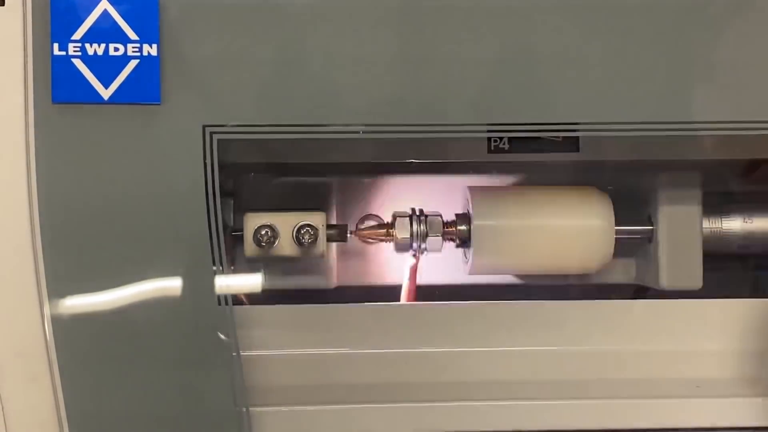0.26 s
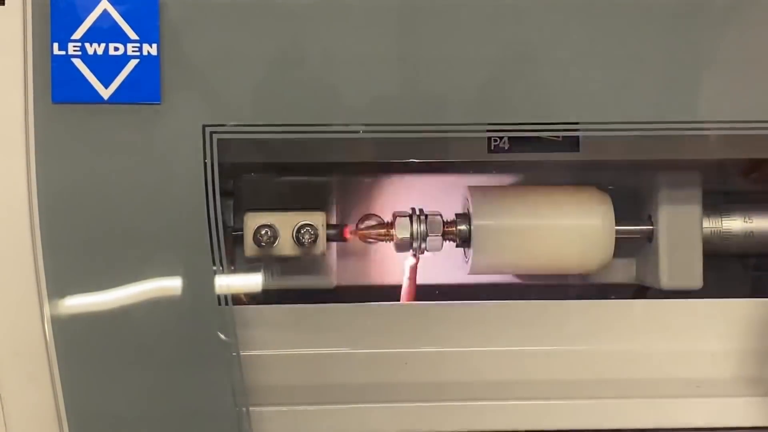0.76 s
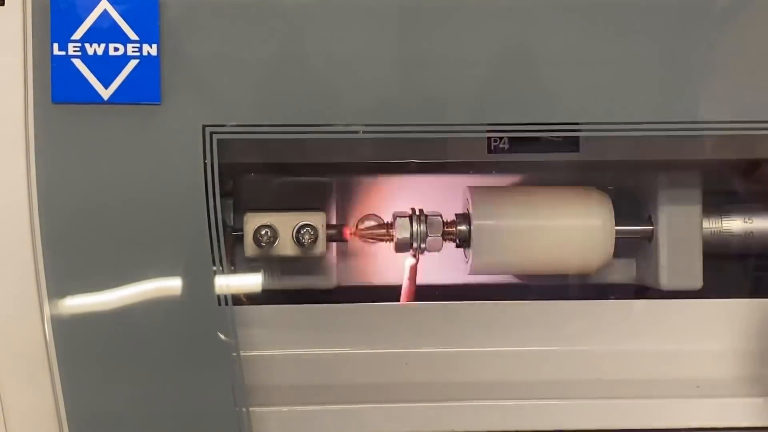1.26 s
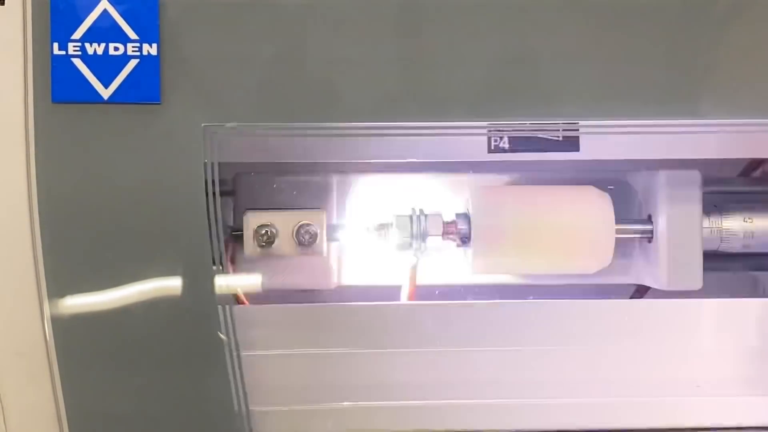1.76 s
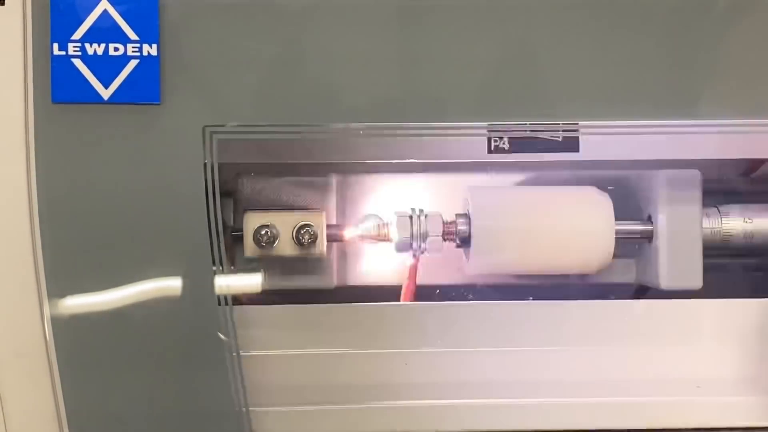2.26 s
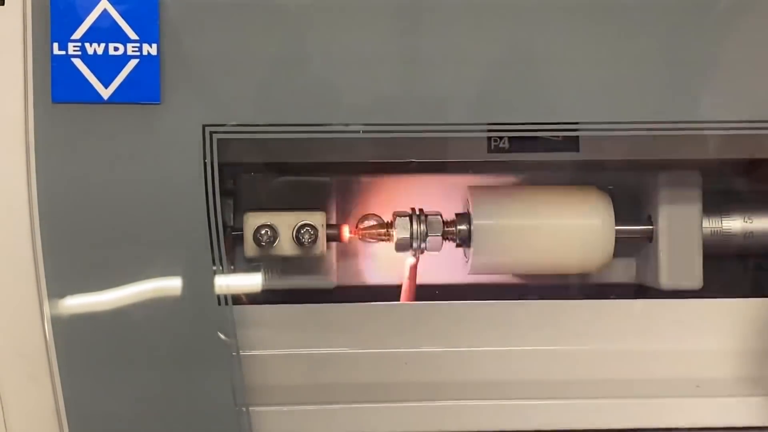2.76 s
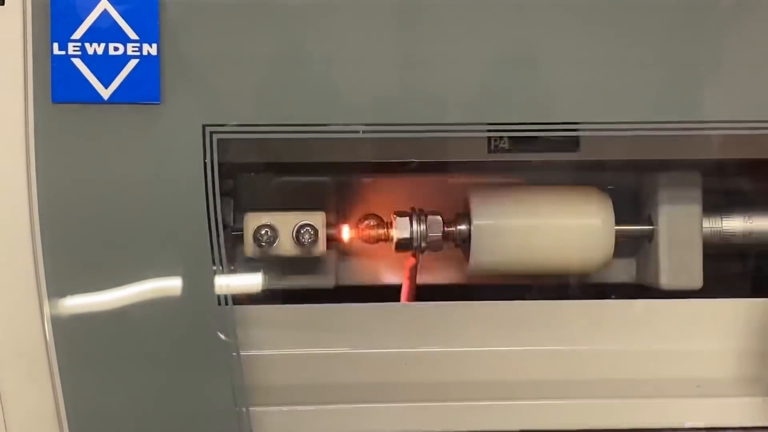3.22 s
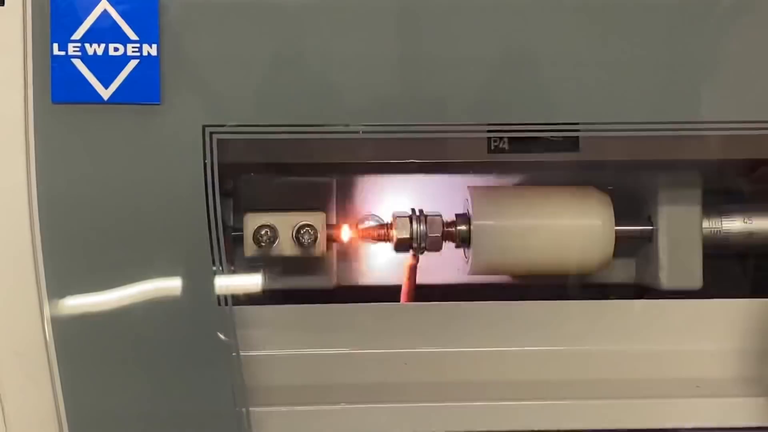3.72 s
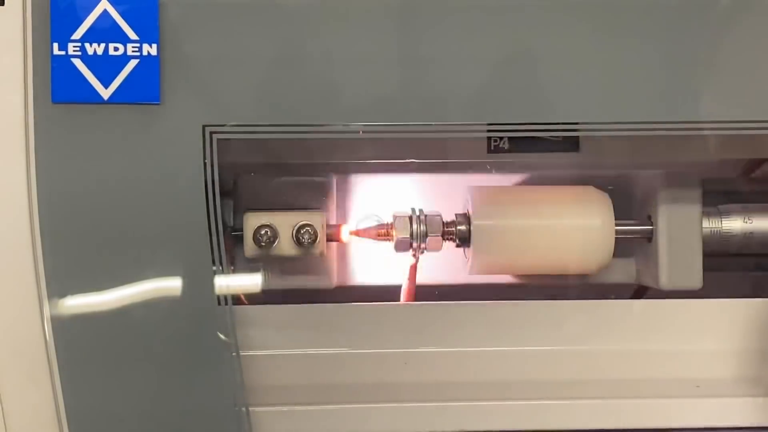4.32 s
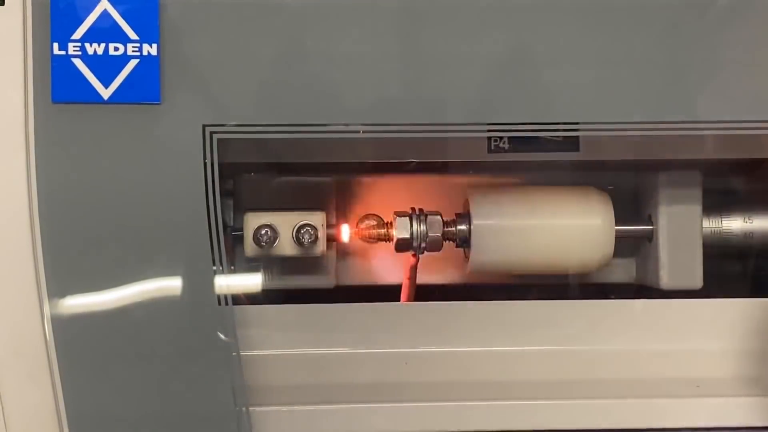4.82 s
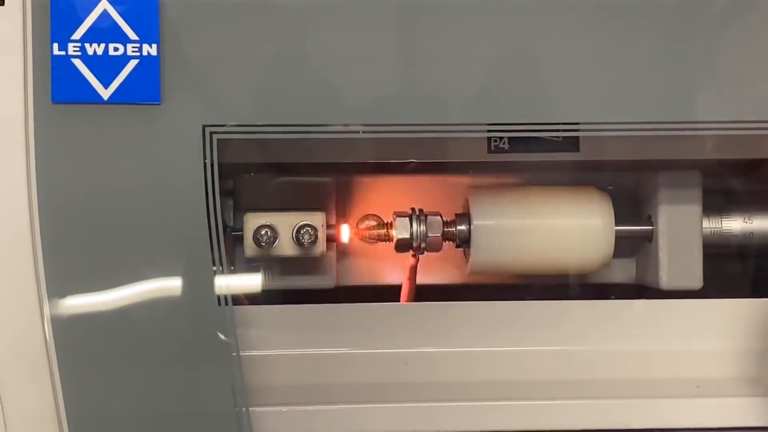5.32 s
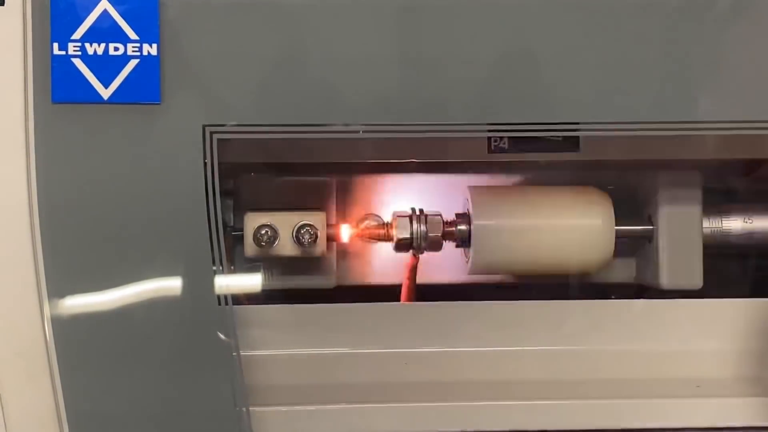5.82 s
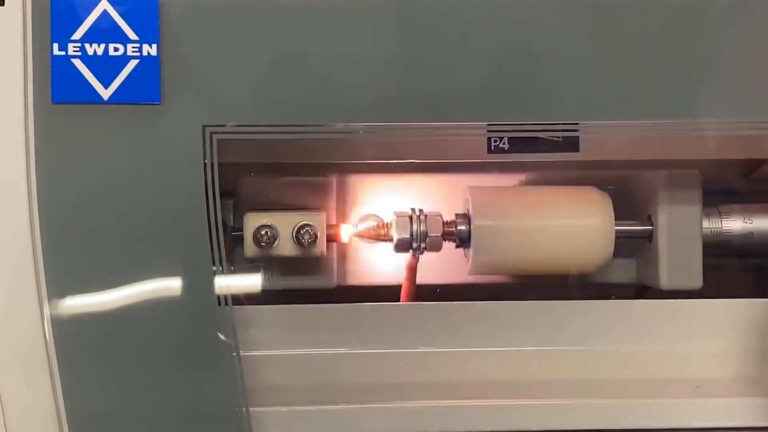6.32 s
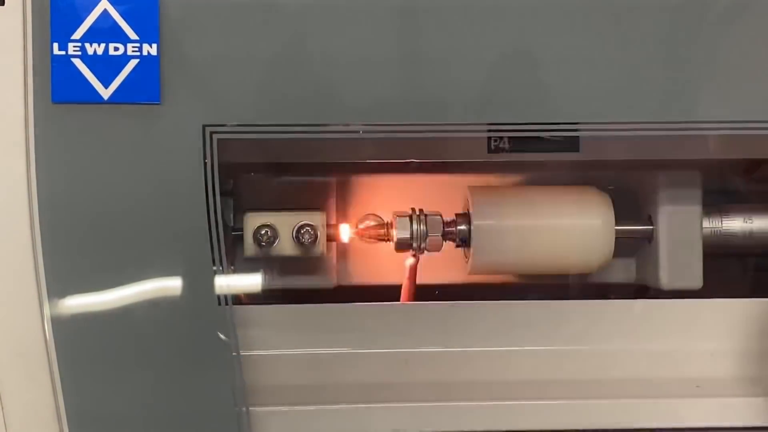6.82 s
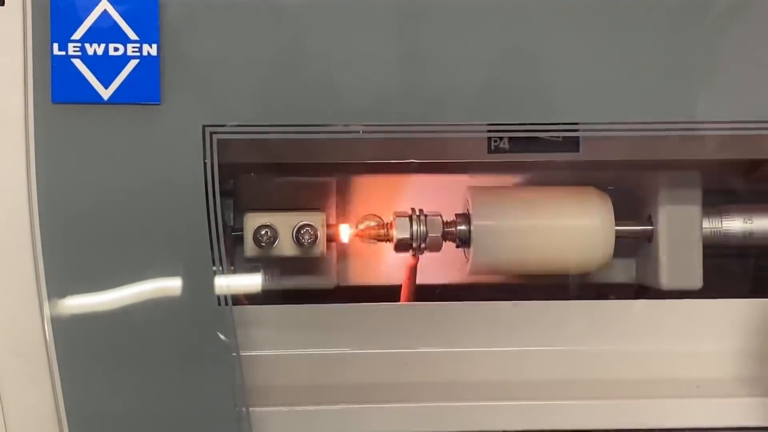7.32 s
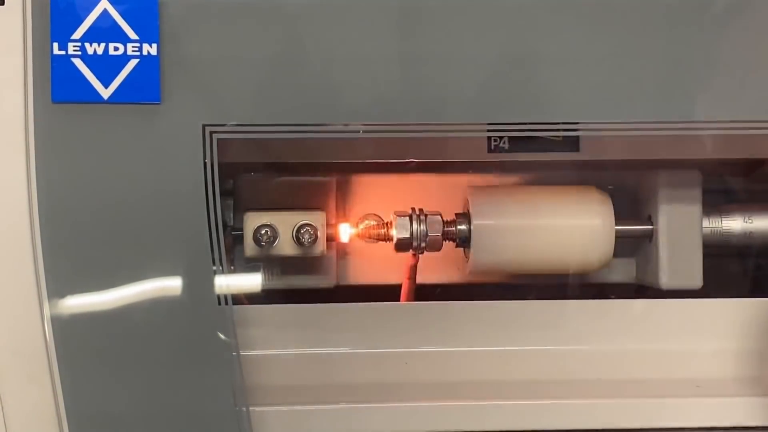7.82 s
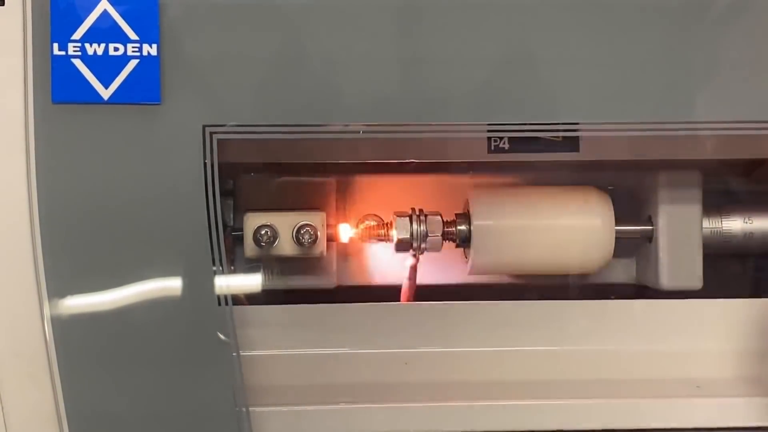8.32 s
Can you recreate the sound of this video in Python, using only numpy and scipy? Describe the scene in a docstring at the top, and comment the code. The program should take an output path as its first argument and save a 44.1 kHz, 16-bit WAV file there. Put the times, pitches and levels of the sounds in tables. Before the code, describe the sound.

An electrical arc sputters weakly in a small closed box, then crackles and sizzles almost nonstop with sharp snaps and thumps over low hum.

```python
"""A mains arc in a carbon gap inside a small closed test box, over fan hum, mains hum and room noise.
From 0 s: weak, broken spells of two strikes per mains cycle; discharge noise rings gap and box.
From 2.1 s: stronger, nearly continuous burning; flashes crack, thumps knock and push the lid, gas roars.
From 2.4 s: the fan, a set of sine orders, slows, then regains most of its speed by 4.8 s.
From 7.7 s: a faint wavering sine joins for under a second while the arc burns on."""
import sys
import numpy as np
from scipy import signal
from scipy.fft import rfft, irfft
from scipy.io import wavfile

SR = 44100
rng = np.random.default_rng(int(sys.argv[2]) if len(sys.argv) > 2 else 0)


def generate_wav(sig):
    """Save sig (samples, or channels by samples) to the path in sys.argv[1] as 16-bit PCM at SR."""
    pcm = np.round(np.clip(np.atleast_2d(sig).T, -1, 1) * 32767).astype(np.int16)
    wavfile.write(sys.argv[1], SR, pcm)


N = 377937
TIME_S = np.arange(N) / SR

# room noise spectrum, relative: f/Hz, level/dB
ROOM_SPECTRUM = [(15, -6), (48, 8), (79, -41), (105, -1.5), (160, 6), (200, -21.5), (300, -58), (420, -9),
                 (614, -15), (741, -24.5), (930, -35), (1050, -32), (2000, -22.5), (4000, -35),
                 (15500, -47.5)]
# fan motor: t/s, speed/(turns/s), first order level/dB, fourth order reference level/dB
FAN_COURSE = [(0, 40, -51, -45), (1.3, 40, -51, -44.5), (2.4, 40, -52, -44), (2.65, 34, -63.5, -59.5),
              (2.9, 32.5, -47, -52), (3.3, 34, -55, -54), (3.6, 36.5, -62, -41), (4.1, 38, -81, -45.5),
              (4.8, 39.3, -53, -44.5), (8.57, 39, -56, -46.5)]
# further fan orders: multiple of speed, level/dB re fourth order reference
FAN_ORDER_LEVELS = [(2, -14.5), (4, 4), (5, -18.5), (13, -16.5)]
# even mains lines: multiple of mains frequency, level/dB
MAINS_LINE_LEVELS = [(2, -53), (4, -60), (8, -60.5), (12, -60), (18, -57)]
# faint wavering tone: t/s, f/Hz, level/dB
FAINT_TONE = [(7.68, 560, -80), (7.75, 585, -51), (7.82, 590, -80), (8.0, 585, -53), (8.05, 570, -49),
              (8.16, 580, -49), (8.25, 590, -52), (8.4, 590, -54), (8.46, 590, -82)]
# pressure thumps on the lid: t/s, relative knock level/dB, relative push level/dB
LID_THUMPS = [(0.222, -43, -52), (0.575, -39, -30), (0.736, -43, -43), (1.489, -38.5, -46),
              (2.131, -38.5, -39), (2.35, -28.5, -16.5), (2.978, -71, -45), (3.208, -41.5, -56),
              (3.609, -33.5, -48), (3.71, -27, -39), (4.608, -42.5, -51), (4.705, -37.5, -38),
              (4.797, -32.5, -23), (4.826, -29, -50), (4.945, -34, -15.5), (5.318, -43.5, -41),
              (5.455, -34.5, -26), (5.545, -41, -47), (5.985, -35, -30), (6.074, -36, -27),
              (6.543, -35, -67), (6.623, -37.5, -21), (6.664, -39.5, -43), (6.722, -44.5, -56),
              (7.204, -34.5, -55), (7.563, -44.5, -59), (7.801, -46, -54), (7.941, -38, -57),
              (8.192, -38.5, -50), (8.259, -43, -52)]
# lid ring: f/Hz, width/Hz, level/dB
LID_RING_MODES = [(420.6, 17.5, 5), (641.4, 34, -11), (863, 34, -2.5), (1200, 67, -44.5)]
# lid flexing: f/Hz, width/Hz, level/dB
LID_FLEX_MODES = [(57, 51, -14), (143, 18.6, 11)]
# rough broad part of the roar: t/s, level/dB re lid ring
BROAD_ROAR_COURSE = [(0, -6.5), (2, -10), (3, -12), (3.6, -10), (5, -17), (6.5, -7.5), (8.57, -10.5)]
# modes of the broad roar: f/Hz, width/Hz, level/dB
BROAD_ROAR_MODES = [(323, 23, -6), (491, 190, 6), (1028, 130, -14)]
# steady burning: start t/s, end t/s, first strike level/dB, second strike level/dB (both relative),
# body level/dB re sizzle, relative gas roar level/dB
BURNING_SPELLS = [(0.0, 0.17, -64, -72.5, 5, -54), (0.184, 0.2, -51, -49, 4, -56),
                  (0.202, 0.244, -42, -40, -1, -20), (0.257, 0.311, -59, -38.5, 4, -31),
                  (0.484, 0.543, -44, -58, -1, -27.5), (0.57, 0.632, -62, -50, 4, -28),
                  (0.652, 0.68, -68, -56, 5, -40), (0.723, 0.819, -63, -70, 13, -33),
                  (0.834, 0.967, -60, -60, 5.5, -41.5), (0.963, 1.03, -49.5, -50, 4.5, -32.5),
                  (1.047, 1.109, -63, -48.5, 5.5, -33.5), (1.391, 1.48, -44, -47, 1.5, -30.5),
                  (1.48, 1.533, -48, -44.5, 3.5, -21), (1.583, 1.624, -45.5, -46, 1.5, -23.5),
                  (2.121, 2.203, -23, -29, -2.5, -19.5), (2.203, 2.37, -21.5, -27, -7.5, -35.5),
                  (2.365, 2.401, -45, -42, -2.5, -37), (2.407, 2.461, -21.5, -36, 0, -27.5),
                  (2.842, 2.92, -35.5, -38, -2.5, -26), (2.963, 3.073, -38, -36.5, 0, -22),
                  (3.066, 3.136, -37, -38.5, -2, -27), (3.12, 3.419, -27.5, -33, -6.5, -33),
                  (3.421, 3.788, -30.5, -32, -4, -31), (3.75, 3.933, -26.5, -42.5, -2, -30.5),
                  (3.935, 4.21, -19, -33, -12, -48), (4.179, 4.365, -40.5, -28, -1.5, -35.5),
                  (4.364, 4.738, -28, -30, -5, -43), (4.75, 4.79, -37, -22, -7.5, -45),
                  (4.784, 4.895, -24.5, -41, -4, -26.5), (4.89, 4.933, -24, -24, -11, -46),
                  (4.94, 5.08, -27, -37, -1, -32.5), (5.069, 5.219, -22.5, -23, -10, -65),
                  (5.227, 5.533, -23.5, -26.5, -9.5, -37.5), (5.526, 5.886, -26, -11, -9.5, -50),
                  (5.917, 6.46, -25, -25.5, -7.5, -45.5), (6.47, 6.53, -31.5, -61, -6.5, -52),
                  (6.524, 6.777, -49, -33.5, -2.5, -47), (6.786, 7.08, -43.5, -34, -7.5, -56),
                  (7.08, 7.135, -50, -42, -5, -44), (7.142, 7.182, -26, -24.5, -3, -43),
                  (7.191, 7.31, -34, -19.5, -6, -45), (7.307, 7.382, -36.5, -30, 0, -42),
                  (7.394, 7.493, -50, -36.5, -2.5, -47), (7.49, 7.697, -45, -24.5, -5, -46),
                  (7.712, 7.921, -45, -33.5, -9, -49), (7.953, 8.08, -48, -23.5, -2.5, -35.5),
                  (8.074, 8.15, -40, -45, -7, -37), (8.14, 8.287, -49, -26, -4.5, -39),
                  (8.28, 8.57, -45, -35, -5.5, -45)]
# breakdown instants: t/s, first strike/(mains cycle), second strike/(mains cycle)
STRIKE_TIMING = [(1, .22, .74), (2.2, .22, .56), (3.5, .17, .67), (4.2, .23, .65), (5.4, .27, .62),
                 (5.8, .22, .62), (6.3, .2, .54), (7, .2, .515)]
# share of a strike that snaps rather than swells: t/s, first strike/1, second strike/1
SNAP_SHARES = [(0, 0.13, 0.22), (3, 0.32, .3), (4, 0.23, 0.51), (5.7, 0.18, 0.2), (6.3, .3, 0.6),
               (7, 0.079, 0.78), (8.57, .1, 1)]
# flashes: t/s, relative sizzle level/dB, relative body level/dB
FLASH_EVENTS = [(0.2933, -21.5, -36.0), (0.3671, -41, -44), (0.5245, -38.0, -39), (0.5741, -15.5, -16),
                (0.5889, -41, -51), (0.6044, -32, -43.0), (0.7328, -28, -51), (0.784, -35, -41.5),
                (0.994, -36, -41), (1.0143, -52, -38.5), (1.4093, -34.5, -38), (1.4824, -15.5, -29.5),
                (1.503, -19.5, -31), (1.5832, -15.5, -29), (1.6014, -15.5, -27), (2.1214, -27.5, -37),
                (2.1709, -14, -24), (2.189, -9, -23), (2.349, -18, -24.5), (2.3632, -1.5, -25),
                (2.423, -5.5, -26.5), (2.8392, -17.5, -32), (2.9697, -24, -31.5), (3.029, -20, -31.5),
                (3.1688, -4, -18), (3.221, -7, -28), (3.2394, -13, -29.5), (3.2813, -6, -29),
                (3.3, -16.0, -45), (3.3417, -14, -34), (3.608, -18, -18), (3.6686, -15, -22),
                (3.6852, -12, -31), (3.7093, -18, -20.5), (3.8008, -10.5, -39), (3.8206, -18, -42),
                (3.8387, -12.0, -45), (3.9017, -13, -29.5), (4.3875, -21, -20), (4.419, -11, -36.0),
                (4.5062, -18.0, -31), (4.5649, -17.5, -42), (4.705, -14, -24), (4.797, -4.5, -17),
                (4.8257, -14.5, -24), (4.8999, -3.5, -25.5), (4.918, -1.5, -18.5), (5, -16, -45),
                (5.1842, -17.5, -26), (5.345, -6.5, -27.5), (5.3786, -7, -22.5), (5.4589, -5.5, -25),
                (5.473, -4.5, -15.5), (5.548, -7, -29), (5.8265, 0, -39), (5.8654, -9, -22),
                (5.9371, -7.5, -26.5), (5.957, -21, -46), (5.977, -10, -23), (6.0732, -4.5, -16),
                (6.3643, -12, -36), (6.4647, -13, -27.5), (6.5381, -5.5, -20.5), (6.6225, -4.5, -19.5),
                (6.664, -10, -19.5), (6.7404, -11, -33), (6.7615, -8.5, -31), (6.903, -16, -35),
                (7.201, -12, -23), (7.262, -12, -31), (7.3617, -13.5, -32), (7.4612, -15, -25.5),
                (7.563, -7.5, -20.5), (7.601, -15, -34), (7.6614, -27, -46), (7.681, -16.0, -26.5),
                (7.8197, -16, -38), (7.8809, -18, -31), (7.94, -6.5, -26), (7.9609, -5.5, -13.5),
                (7.981, -7, -31), (8.1401, -10.5, -26.5), (8.1886, -12, -20), (8.2613, -13, -25.5),
                (8.4391, -12, -24)]
# warming of the gap: t/s, share of hot gap modes/1
HOT_SHARE = [(1.2, 0.43), (2.2, 0.67), (3.2, 0.64)]
# hot gap: f/Hz, width/Hz, level/dB
HOT_GAP_MODES = [(6910, 250, -6.5), (7250, 120, 2), (7790, 430, -3), (8770, 470, -2), (9500, 358, 6),
                 (15400, 700, -15.5), (11500, 380, -8.5), (13500, 400, -14)]
# cold narrow gap: f/Hz, width/Hz, level/dB
COLD_GAP_MODES = [(6910, 210, -5), (8825, 640, 3.5), (12100, 180, -4.5), (14800, 510, -13.5)]
# box walls: f/Hz, width/Hz, level/dB
BOX_WALL_MODES = [(2057, 73, -11), (2545, 71, -0.5), (3078, 29.5, -2.5), (3583, 160, -2.5), (3973, 108, -4),
                  (4656, 172, -6), (5325, 69, -13), (5870, 100, -10)]

ROOM_DB, MAINS_HZ, CUTOFF_HZ = -47.5, 50.06, 16100
DRONE_HZ, DRONE_DB = 110.6, -46.5
IDLE_ROAR_DB, IDLE_FAN_SHARE = -40.5, 0.25   # relative roar with the gap out; share of the fan's dB swing
ROAR_LAG_S, STRIKE_TAP_DB = 0.005, -1.5   # tap on the lid re strike body
EMBER_FROM_S, EMBER_DB = 2.98, -44   # faint relative strikes between spells once glowing
STRIKE_JITTER_S, FLASH_GUARD_S = 0.0003, 0.004
OUT_DB = -150   # marks the gap as out


def amp(db):
    """Level in dB to amplitude ratio."""
    return 10 ** (np.asarray(db) / 20)


def rms_one(x):
    """Scale to unit rms."""
    return x / np.sqrt(np.mean(x ** 2) + 1e-20)


def in_time(rows, t_s):
    """Interpolate the columns of a table linearly in time."""
    table_s, *columns = np.transpose(rows)
    return [np.interp(t_s, table_s, c) for c in columns]


def in_spells(t_s):
    """Columns of the spell burning at each time; OUT_DB between spells."""
    spells = np.array(BURNING_SPELLS)
    latest = spells[np.maximum(np.searchsorted(spells[:, 0], t_s) - 1, 0)]
    burning = (t_s > latest[:, 0]) & (t_s < latest[:, 1])
    return np.where(burning, latest[:, 2:].T, OUT_DB)


def drift(rate_hz):
    """Low-passed chance, unit rms."""
    pole = np.exp(-2 * np.pi * rate_hz / SR)
    noise = rng.standard_normal(N + SR)
    return rms_one(signal.lfilter([1], [1, -2 * pole, pole * pole], noise)[SR:])


def band(x, low_hz, high_hz):
    """Butterworth band-pass."""
    return signal.sosfilt(signal.butter(2, [low_hz, high_hz], "band", fs=SR, output="sos"), x)


def band_twice(x, low_hz, high_hz):
    """Steeper band-pass: two in series."""
    return band(band(x, low_hz, high_hz), low_hz, high_hz)


def resonate(x, modes):
    """Parallel two-pole resonances, signs alternating."""
    out = 0
    for k, (f_hz, width_hz, db) in enumerate(modes):
        r = np.exp(-np.pi * width_hz / SR)
        b = amp(db) * (1 - r * r) / 2 * np.array([1, 0, -1])
        a = [1, -2 * r * np.cos(2 * np.pi * f_hz / SR), r * r]
        out = out + (-1) ** k * signal.lfilter(b, a, x + 1e-18)
    return out


def bursts(times_s, level_db, rise_s, fall_s):
    """Envelope: a rounded swell and an exponential fall at each time."""
    clicks = np.zeros(N)
    np.add.at(clicks, np.clip((times_s * SR).astype(int), 0, N - 1), amp(level_db))
    rise, fall = np.exp(-2 / (rise_s * SR)), np.exp(-1 / (fall_s * SR))
    falling = signal.lfilter([1], [1, -fall], clicks + 1e-18)
    return signal.lfilter([(1 - rise) ** 2], [1, -2 * rise, rise ** 2], falling)


def discharges(spread_db):
    """Dense micro-discharges of uneven size and sign, unit rms."""
    noise = rng.standard_normal(N)
    sizes = amp(spread_db * np.minimum(rng.exponential(1, N), 5))
    return rms_one(noise * sizes)


def room():
    """Steady noise, shaped in frequency by the room spectrum."""
    f_hz, db = np.transpose(ROOM_SPECTRUM)
    bins_hz = np.arange(N // 2 + 1) * SR / N
    shape = amp(np.interp(np.log(bins_hz + 1), np.log(f_hz), db))
    return amp(ROOM_DB) * rms_one(irfft(rfft(rng.standard_normal(N)) * shape, N))


def mains_hum():
    """Even mains multiples, each slowly wavering in level."""
    out = 0
    for multiple, db in MAINS_LINE_LEVELS:
        out = out + amp(db + 1.1 * drift(3)) * np.sin(2 * np.pi * multiple * MAINS_HZ * TIME_S)
    return np.sqrt(2) * out


def drone():
    """Continuous sine in the room, wavering in level and phase."""
    level = amp(DRONE_DB + 2.0 * drift(7.1))
    return np.sqrt(2) * level * np.sin(2 * np.pi * DRONE_HZ * TIME_S + 1.3 * drift(9.4))


def faint_tone():
    """Sine that follows the wavering pitch and level of its table."""
    f_hz, db = in_time(FAINT_TONE, TIME_S)
    return np.sqrt(2) * amp(db) * np.sin(2 * np.pi * np.cumsum(f_hz) / SR)


def fan():
    """Sine orders locked to the fan speed; those above the first waver in level."""
    turns_per_s, first_db, fourth_db = in_time(FAN_COURSE, TIME_S)
    angle = 2 * np.pi * np.cumsum(turns_per_s) / SR
    out = amp(first_db) * np.sin(angle)
    for order, db in FAN_ORDER_LEVELS:
        level = amp(db + fourth_db + 2.3 * drift(26.0))
        out = out + level * np.sin(order * angle + rng.uniform(0, 2 * np.pi))
    return np.sqrt(2) * out


def gas_roar():
    """Turbulent gas noise: follows the burning spells with a lag, over idle air that follows the fan."""
    fan_db = in_time(FAN_COURSE, TIME_S)[2]
    idle = amp(IDLE_ROAR_DB + IDLE_FAN_SHARE * (fan_db - fan_db.mean()))
    drive = amp(in_spells(TIME_S)[3]) + idle
    keep = np.exp(-1 / (ROAR_LAG_S * SR))
    lagged = signal.lfilter([1 - keep], [1, -keep], drive)
    flow = discharges(spread_db=1.5) * lagged * amp(2.5 * drift(49) + 16.5)
    return amp(-7.0) * band(flow, 84, 1200)


def lid_knock(body):
    """Thumps hit the lid with a click and a noise burst; strikes tap it."""
    t_s, knock_db, _ = np.transpose(LID_THUMPS)
    click = np.diff(bursts(t_s, knock_db + 38.5, 0.000067, 0.00022), prepend=0) * 10
    rough = bursts(t_s, knock_db + 36.0, 0.0013, 0.0045) + amp(STRIKE_TAP_DB) * body
    return click + rough * rng.standard_normal(N)


def lid(body):
    """Knocks and roar ring the lid modes; pressure pushes and roar flex it."""
    knock = lid_knock(body)
    flow = gas_roar()
    t_s, _, push_db = np.transpose(LID_THUMPS)
    push = -bursts(t_s, push_db + 19.0, 0.0046, 0.0045)
    ring = resonate(knock + flow, LID_RING_MODES)
    broad = band_twice(flow + 0.22 * knock, 270, 1390) + resonate(flow, BROAD_ROAR_MODES)
    broad_db, = in_time(BROAD_ROAR_COURSE, TIME_S)
    clatter = amp(-22) * band(knock, 690, 3200)
    flex = resonate(push + amp(-7.0) * flow, LID_FLEX_MODES)
    return ring + amp(broad_db) * broad + clatter + flex


def strikes():
    """Envelopes of sizzle and body: two uneven breakdowns per mains cycle, plus flashes."""
    cycles = np.arange(int(N / SR * MAINS_HZ))
    flash_s, flash_db, flash_body_db = np.transpose(FLASH_EVENTS)
    sizzle = bursts(flash_s, flash_db + 1.5, 0.00091, 0.00096)
    body = bursts(flash_s, flash_body_db + 10.5, 0.0001, 0.0029)
    snap_shares = in_time(SNAP_SHARES, TIME_S)
    for k, phase in enumerate(in_time(STRIKE_TIMING, cycles / MAINS_HZ)):
        chance = np.clip(rng.standard_normal((len(cycles), 3)), -1.6, 1.6)
        t_s = (cycles + phase) / MAINS_HZ + STRIKE_JITTER_S * chance[:, 0]
        levels = in_spells(t_s)
        ember = (levels[k] == OUT_DB) & (t_s > EMBER_FROM_S)
        levels[k, ember], levels[2, ember] = EMBER_DB, 0
        # a flash takes the place of the strike
        spent = np.abs(t_s[:, None] - flash_s).min(axis=1) < FLASH_GUARD_S
        db = levels[k] + 2.5 * chance[:, 1] - 15 * spent
        body_db = db + 10.0 + levels[2] + 3.04 * chance[:, 2]
        snap = snap_shares[k]
        sizzle = sizzle + (1 - snap) * bursts(t_s, db + 6.5, 0.0021, 0.002)
        sizzle = sizzle + snap * bursts(t_s, db + 8.0, 0.00032, 0.0012)
        body = body + (1 - snap) * bursts(t_s, body_db, 0.0024, 0.0025)
        body = body + snap * bursts(t_s, body_db + 3.0, 0.0001, 0.0015)
    return sizzle, body


def in_box(envelope, t60_s, tail_db):
    """Discharges under the envelope, then diffuse box reflections as dying noise."""
    keep = amp(-120 / (t60_s * SR))   # energy decay per sample
    tail = np.sqrt(signal.lfilter([1 - keep], [1, -keep], envelope ** 2))
    return envelope * discharges(spread_db=4.0) + amp(tail_db) * tail * rng.standard_normal(N)


def box_echo(x, t60_s, level_db):
    """Unchanging dense reflections from lid and walls, which comb the spectrum finely."""
    t_s = np.arange(int(.1 * SR)) / SR
    tail = rng.standard_normal(len(t_s)) * amp(-60 * t_s / t60_s)
    tail = tail / np.sqrt(np.sum(tail ** 2))
    return x + amp(level_db) * signal.fftconvolve(x, tail)[:N]


def arc(sizzle_envelope, body_envelope):
    """Discharge bursts ring gap and box, with a broad part between the modes."""
    sizzle = in_box(sizzle_envelope, t60_s=0.05, tail_db=-14)
    body = in_box(body_envelope, t60_s=0.054, tail_db=-8)
    hot, = in_time(HOT_SHARE, TIME_S)
    gap = resonate(hot * sizzle, HOT_GAP_MODES) + resonate((1 - hot) * sizzle, COLD_GAP_MODES)
    gap = gap + amp(-15) * band_twice(sizzle, 4950, 16000)
    box = resonate(body, BOX_WALL_MODES) + amp(-17.5) * band(body, 1190, 7800)
    return box_echo(amp(9.5) * (gap + box), t60_s=0.052, level_db=-4.0)


def scene():
    """All sources at one microphone."""
    sizzle, body = strikes()
    inside = arc(sizzle, body) + lid(body)
    return (inside + drone() + fan() + mains_hum() + faint_tone() + room())[None]


def record(dry):
    """Round the peaks, cut the top."""
    rounded = 1.26 * np.tanh(dry / 1.796)
    return signal.sosfilt(signal.cheby2(24, 70, CUTOFF_HZ, fs=SR, output="sos"), rounded)


dry = scene()
out = record(dry)
generate_wav(out)
```